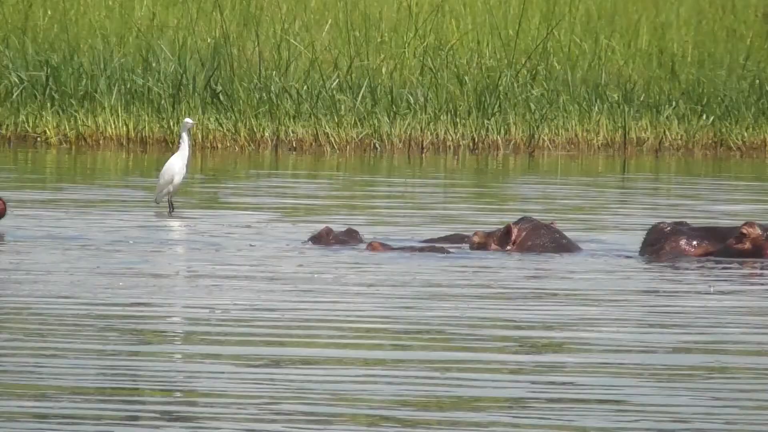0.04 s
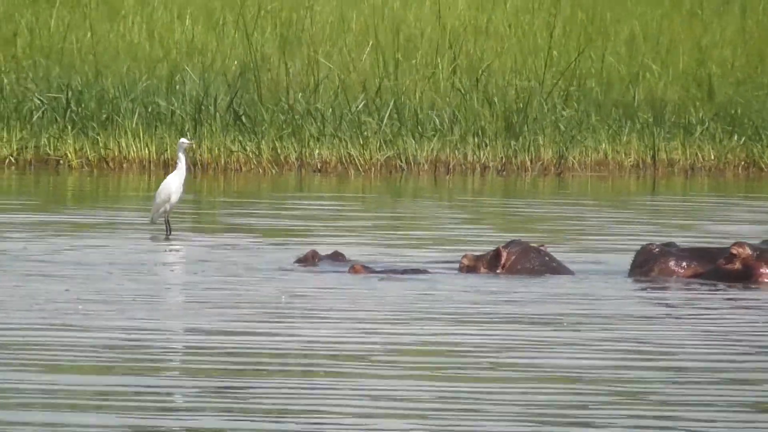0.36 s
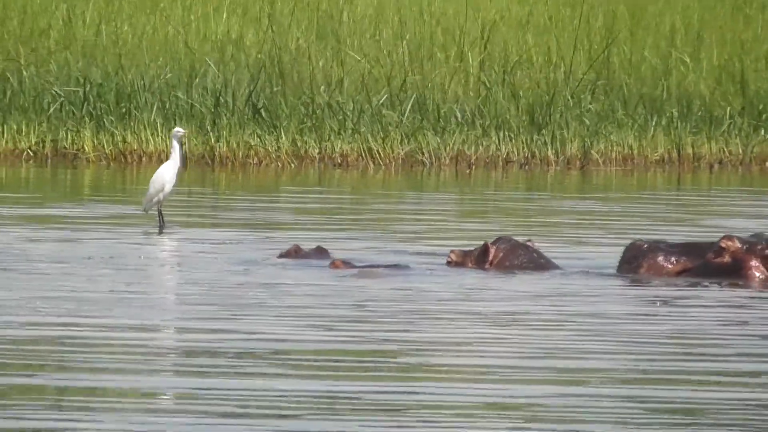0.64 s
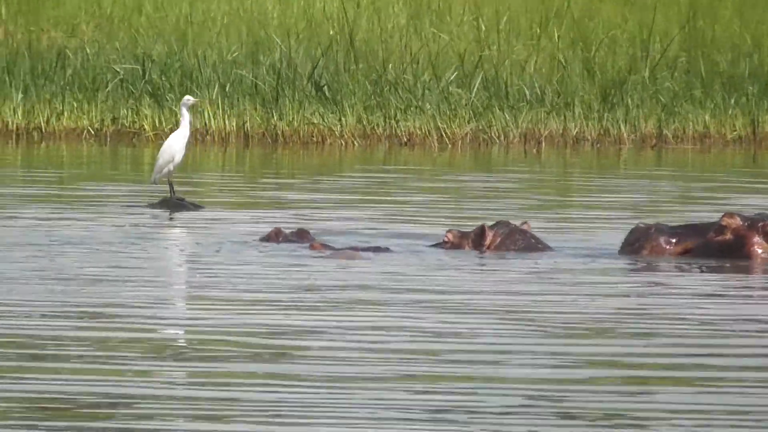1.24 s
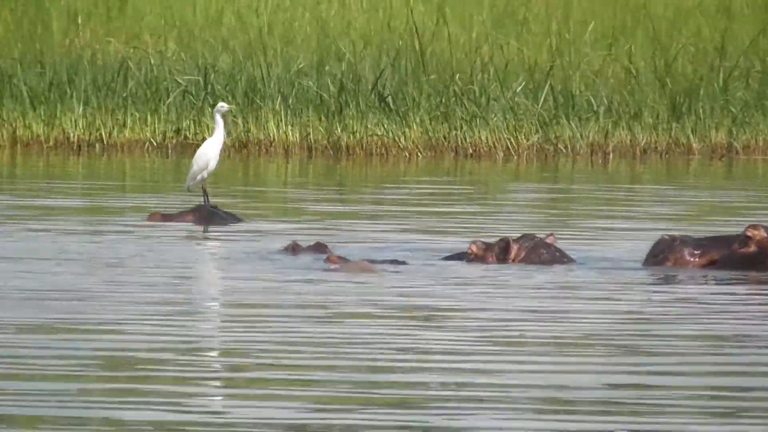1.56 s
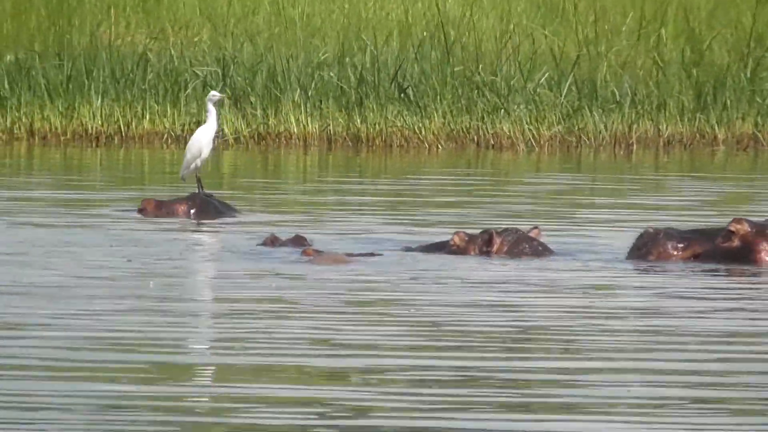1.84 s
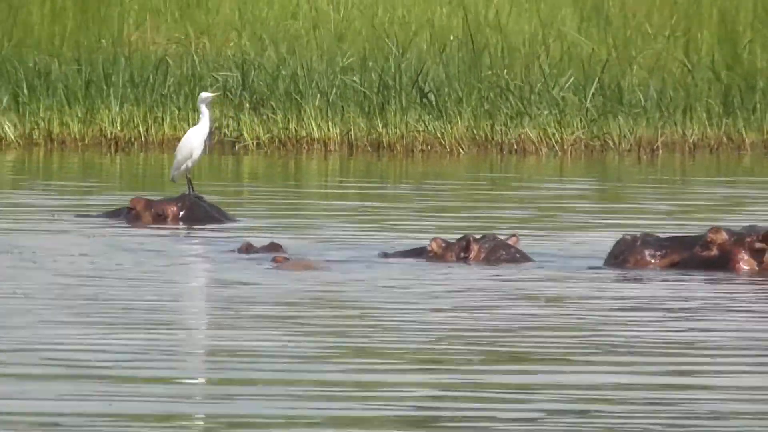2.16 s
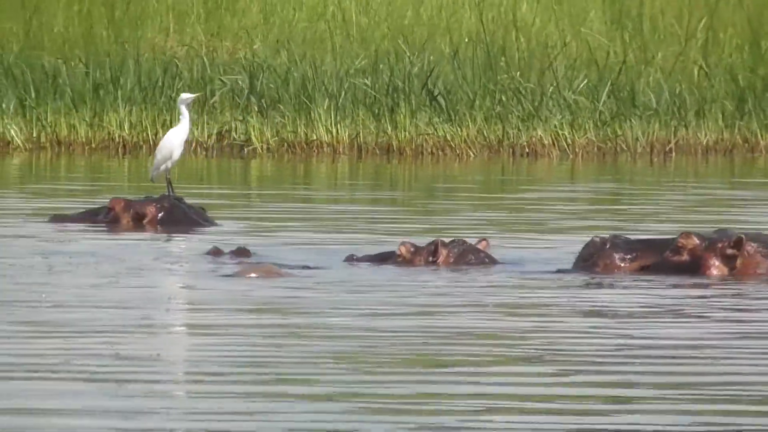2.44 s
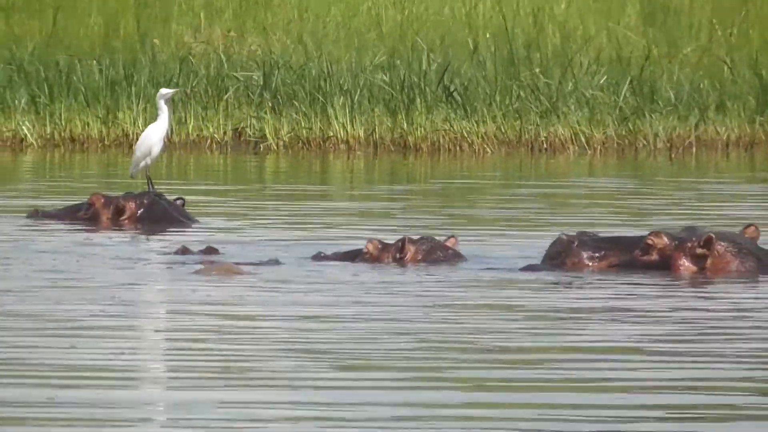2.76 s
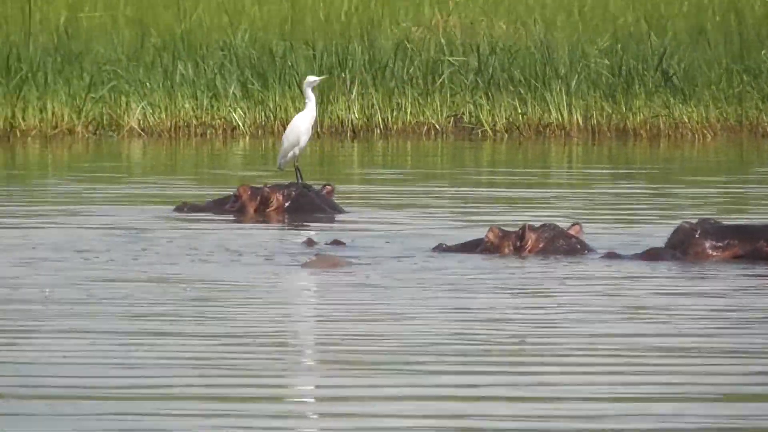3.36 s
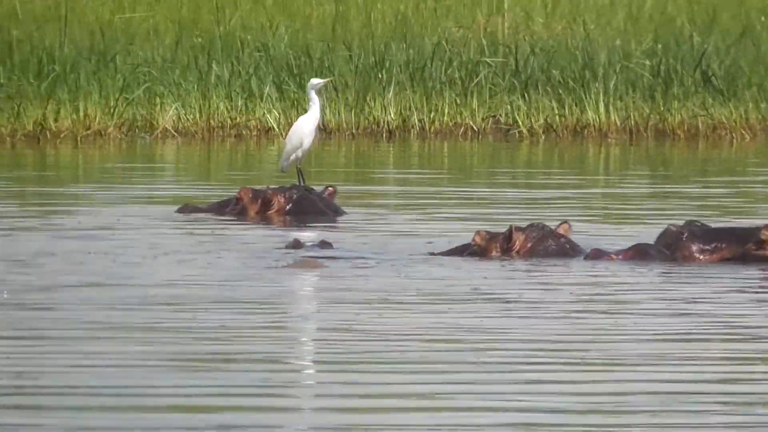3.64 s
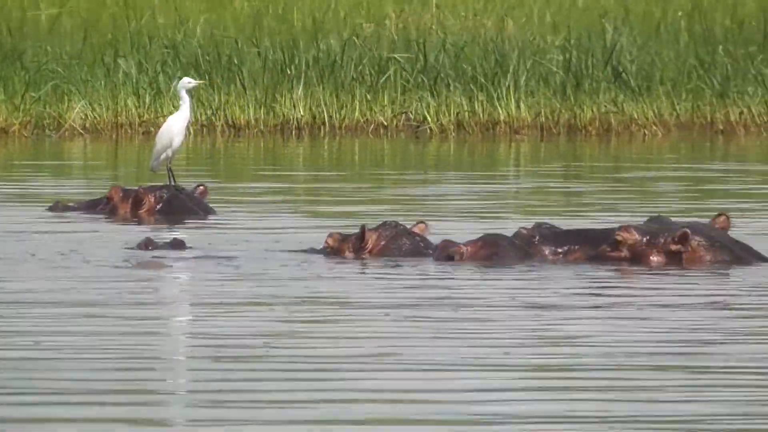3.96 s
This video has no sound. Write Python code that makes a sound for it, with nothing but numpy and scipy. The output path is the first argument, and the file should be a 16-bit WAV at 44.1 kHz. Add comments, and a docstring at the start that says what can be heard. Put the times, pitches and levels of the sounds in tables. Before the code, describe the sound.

A small outboard motor drones at a steady speed, heard from on board a boat on a river. Water churns and hisses at the bow throughout, with small splashes, soft slaps on the hull and light wind bumping the microphone.

```python
"""A small outboard motor pushes a boat along a river at a steady speed, heard from on board.
Its exhaust thumps so fast that it drones, its gears whine and the hull hums along.
The bow wave churns and throws hissing spray, both full of tiny ringing bubbles.
Splashes land close by, small waves slap the hull and light wind bumps the microphone."""
import sys
import numpy as np
from scipy import signal
from scipy.fft import rfft, irfft
from scipy.io import wavfile

SR = 44100
rng = np.random.default_rng(int(sys.argv[2]) if len(sys.argv) > 2 else 0)


def wav_record(signal):
    """Record a signal, one row per channel, as 16-bit PCM in the file named by sys.argv[1]."""
    frames = np.transpose(np.atleast_2d(signal))
    bounded = np.clip(frames, -1, 1)
    # unit amplitude maps onto the largest positive 16-bit level
    quanta = np.round(bounded * 32767).astype(np.int16)
    wavfile.write(sys.argv[1], SR, quanta)


N = 176400
TIME = np.arange(N) / SR  # seconds
FREQS = np.arange(N // 2 + 1) * SR / N  # Hz


def motor():
    """The turning engine drives the exhaust and gears; with the hull's hum they sit slightly right."""
    # Each row: time in seconds, engine speed in turns per second.
    engine_speed = [(0.1, 32.8), (0.5, 33.03), (1.0, 32.85), (1.45, 32.89), (1.7, 32.42), (1.95, 32.65),
                    (2.2, 32.93), (2.5, 32.78), (2.8, 32.94), (3.4, 33.0), (3.75, 32.6), (4.0, 32.69)]
    speed = curve(engine_speed)
    turns = np.cumsum(speed) / SR
    sound = level(exhaust(speed, turns), -18) + level(gears(turns), -38.5) + level(hull_hum(), -36.5)
    return sound * undb([[-.5], [.5]])


def exhaust(speed, turns):
    """One thump on every turn makes a drone: a stack of tones at multiples of the engine speed."""
    # Each row: multiple of the engine speed, relative level in dB.
    tones = [(2,0.5),(3,-26),(4,-1),(5,1.5),(6,0.67),(7,-1),(8,-6),(9,-2.5),(10,-5.5),(11,-13),(12,-4.5),(15,-8.5),(16,-8.5),(18,-12),(19,-9.5),(20,-4),(22,-12),(24,-22),(30,-13.5)]
    # Each row: time in seconds, level change in dB of the sixth multiple, near 200 Hz.
    sixth_swell = [(0.1,2),(0.4,3.5),(0.65,-0.5),(1.05,-6),(1.28,2),(1.5,-5),(1.8,2.5),(2.05,0),(2.3,5.5),(2.65,-5),(3.0,0),(3.3,5),(3.7,-1.5),(4.0,1.5)]
    # Each row: time in seconds, level change in dB of the ninth multiple, near 300 Hz.
    ninth_swell = [(0.1,2.5),(0.65,6),(1.05,2.5),(1.5,-0.5),(2.0,1),(2.2,-8),(2.4,-2),(2.85,2.5),(3.3,3.5),(3.68,-7),(4.0,-5)]
    # Each row: time in seconds, level change in dB at throb_hz (tones further away change less).
    drone_swell = [(0.1, -1.2), (0.6, -0.5), (1.02, 0), (1.3, 1.8), (1.62, 1), (2.3, -1), (2.71, 0.5),
                   (2.88, 1.5), (3.03, -6.5), (3.15, -1), (3.3, -1.5), (3.69, -0.5), (4.0, 0.5)]
    throb_hz, scatter_above_hz = 234.5, 345
    lead_s, jitter_s, late_s, echo_s, echo_gain = .00049, .00007, .00803, .013, .48
    thumps = turns + speed * (lead_s + jitter_s * wander(13))
    firing_db = 1.2 * wander(29) + curve(drone_swell)  # the engine fires unevenly
    swells = {6: curve(sixth_swell), 9: curve(ninth_swell)}
    out = np.zeros(N)
    for multiple, db in tones:
        hz = multiple * speed.mean()
        # The top of each thump comes late, an echo shifts each tone's timing,
        # and the hull throws the higher tones out of step.
        late = 2 * np.pi * late_s * max(hz - throb_hz, 0)
        echo = np.angle(1 + echo_gain * np.exp(-2j * np.pi * hz * echo_s))
        scatter = 2 * np.pi * rng.random() * (hz > scatter_above_hz)
        throb_db = np.exp(-np.log2(hz / throb_hz) ** 2) * firing_db
        waver_db = min(hz / throb_hz, 1) * 1.04 * wander(3.5)
        gain = undb(db + throb_db + waver_db + swells.get(multiple, 0))
        out += gain * np.cos(2 * np.pi * multiple * thumps - late + echo + scatter)
    return out


def gears(turns):
    """The gears whine: one wavering tone that follows the engine speed."""
    # Each row: time in seconds, level change in dB.
    whine_swell = [(0.1,-2),(0.5,0.5),(1.1,-2.5),(1.35,0),(1.6,-3.5),(2.25,0.5),(2.65,0),(2.95,1),(3.4,1),(3.7,-2),(4.0,-3)]
    cycles_per_turn = 52.04
    gain = undb(curve(whine_swell) + 1.5 * wander(9.2))
    return gain * np.sin(2 * np.pi * cycles_per_turn * turns + .46 * wander(18))


def hull_hum(hz=93.1):
    """The hull hums on one low note that comes and goes."""
    return wander(4.4) * np.sin(2 * np.pi * hz * TIME)


def bow_wave():
    """The bow wave churns: bands of noise surge together and flicker alone, and bubbles gurgle in it."""
    # Each row: frequency in Hz, relative level in dB.
    churn_tone = [(30,-14),(70,-10.5),(130,0),(250,3),(420,-2.3),(700,-1.5),(1100,-3.5),(1450,-9.5),(1900,-9.5),(3000,-15),(3900,-22),(5000,-22.5),(9000,-31),(12500,-62)]
    # Each row: time in seconds, swell (one unit is 0.68 dB).
    swell = [(0.1, -3), (0.34, -1), (0.4, 1.3), (0.5, -3.5), (0.64, -0.7), (0.76, -1.8), (0.96, 2),
             (1.02, -2), (1.18, -1.1), (1.34, 1.5), (1.58, -1.5), (1.62, -0.2), (1.78, 0), (1.9, 1.3),
             (1.96, -1.5), (2.39, 1), (2.45, -0.5), (2.77, 3), (2.92, 2), (3.01, -3.5), (3.09, 0.8),
             (3.21, -2.5), (3.27, 3), (3.34, 1.5), (3.4, -0.5), (3.55, 2), (3.67, -1.5), (3.93, 2.5),
             (4.0, -1.5)]
    half_octaves = 2 * np.log2(np.maximum(FREQS, 1))
    spectrum = rfft(colour(rng.standard_normal((2, N)), churn_tone))
    surge = undb(.4 * wander(23) + .68 * curve(swell))
    churn = np.zeros((2, N))
    for band in range(8, 30):
        share = np.maximum(1 - abs(half_octaves - band), 0)
        churn += irfft(spectrum * share, N) * undb(1.53 * wander(38))
    gurgle = bubbles(low_hz=373, high_hz=3470, cycles=8.1, scatter_db=4, slope=.39, count=1600)
    return surge * (level(churn, -21.5) + level(gurgle, -28.5))


def spray():
    """Spray falls back in spurts: a hiss full of tiny drops."""
    # Each row: frequency in Hz, relative level in dB.
    spray_tone = [(1500,-0.5),(3000,-4.5),(4300,-3.5),(5000,-6),(5700,-1),(6300,-1.5),(7300,1.5),(8400,-0.5),(10000,-4.5),(11200,-11.5),(12500,-25),(16000,-40)]
    # Each row: time in seconds, swell (one unit is 0.67 dB).
    swell = [(0.1, -0.4), (0.22, -3), (0.26, -0.5), (0.46, -0.5), (0.54, -4), (0.7, 1), (0.76, -2.5),
             (0.84, 1), (1.1, 1.6), (1.22, -3), (1.32, 0.0), (1.52, -0.5), (1.78, -2), (1.88, 1.5),
             (2.26, -1.8), (2.31, 3), (2.59, -1.5), (2.63, 3.5), (2.71, -3.5), (2.91, 5), (3.03, 0.7),
             (3.13, 2.3), (3.19, 0.7), (3.39, -2), (3.45, 0.7), (3.69, -1.3), (3.79, 4), (4.0, -0.5)]
    fizz = bubbles(low_hz=2525, high_hz=12040, cycles=14.4, scatter_db=1.5, slope=-.51, count=5000)
    hiss = rng.standard_normal((2, N))
    spurts = undb(.47 * wander(5.5) + wander(37) + .67 * curve(swell))
    return spurts * (level(colour(hiss, spray_tone), -31) + level(colour(fizz, spray_tone), -33.5))


def bubbles(low_hz, high_hz, cycles, scatter_db, slope, count):
    """Two clouds of `count` bubbles each; a slope above zero makes the big, low ones louder."""
    out = np.zeros((2, N))
    for cloud in out:
        for when, pitch, strength, ring in rng.random((count, 4)):
            hz = low_hz * (high_hz / low_hz) ** pitch
            boost_db = -scatter_db * np.log(1 - .99 * strength)  # a few stand out
            gain = undb(boost_db) * (low_hz / hz) ** slope
            add_bubble(cloud, when * N / SR, hz, gain, cycles * (.5 + ring))
    return out


def add_bubble(out, start_s, hz, gain, cycles, rise=.19):
    """One bubble rings: it swells, then dies away as its pitch rises."""
    first = int(start_s * SR)
    life = np.arange(int(cycles * SR / hz))[:max(N - first, 0)] * hz / SR / cycles  # from 0 to 1
    ring = np.sin(2 * np.pi * cycles * life * (1 + rise * life / 2))
    swell = 1 - np.exp(-(life * cycles / 1.15) ** 2)
    out[first:first + len(life)] += gain * ring * swell * .01 ** life


def splashes(splat_s=.0033):
    """A few splashes land close to the hull, each a short splat of noise and a ringing bubble."""
    # Each row: start in seconds, pitch in Hz, ring level in dB, ring length in cycles, splat level in dB.
    drops = [(.257,8170,-21,25,-22),(.283,6700,-18,60,-29),(0.441,1200,-8,10,-13),(.823,836,-4.5,12,-8),(1.607,1190,-12,18,-17),(1.858,2840,-17,10,-31),(2.187,7560,-7.5,36,-23),(2.626,7680,-19,20,-31),(2.969,3300,-8,7.1,-20),(3.352,4060,-6,5.8,-19),(3.48,6800,-8,25,-22),(3.76,7450,-26,25,-25),(3.934,640,-4,24,-18)]
    # Each row: multiple of the splash's pitch, relative level in dB.
    splat_tone = [(.25,-30),(.7,6),(1,-2),(1.4,-0.5),(2,-19),(4,-55)]
    # Each row: frequency in Hz, level change in dB that dulls the highs.
    dulling = [(9000,0),(11000,-6),(12500,-28),(16000,-45)]
    out = np.zeros(N)
    for start_s, hz, ring_db, cycles, splat_db in drops:
        add_bubble(out, start_s, hz, undb(ring_db), cycles)
        age = np.maximum(TIME - start_s, 0) / splat_s
        splat = colour(rng.standard_normal(N), np.array(splat_tone) * [hz, 1])
        out += level(splat, splat_db) * np.sqrt(age) * np.exp(1 - 2 * age)
    return colour(out, dulling)


def slaps(half_length_s=.016, half_width_octaves=.78):
    """Small waves meet the hull with soft, hollow thuds."""
    # Each row: loudest moment in seconds, pitch in Hz, level at that moment in dB.
    waves = [(.695,210,-19),(1.06,520,-19.5),(1.085,169,-21),(1.29,210,-20),(1.62,644,-20),(2.133,330,-19),(2.41,556,-22),(2.9,230,-20.5),(3.14,190,-19),(3.635,190,-23),(3.988,200,-20)]
    octaves = np.log2(np.maximum(FREQS, 1))
    out = np.zeros(N)
    for peak_s, hz, db in waves:
        band = np.exp(-((octaves - np.log2(hz)) / half_width_octaves) ** 2)
        thud = irfft(rfft(rng.standard_normal(N)) * band, N)
        out += level(thud, db) * np.exp(-((TIME - peak_s) / half_length_s) ** 2)
    return out


def wind():
    """Short swirls of air thump the microphone, a little differently on each side."""
    # Each row: loudest moment in seconds, length in seconds, level at that moment in dB.
    bumps = [(0.6,0.086,-24.5),(1.076,.03,-21.5),(1.574,0.053,-21),(1.7,0.056,-21),(2.166,0.038,-23),(2.443,0.041,-31),(2.67,0.028,-30),(2.84,0.06,-20.5),(2.904,0.04,-21),(3.14,0.028,-24),(3.29,0.064,-22),(3.643,0.11,-25.5),(3.92,0.12,-22)]
    # Each row: frequency in Hz, relative level in dB.
    rumble_tone = [(12,-14),(35,2),(70,5),(120,1.5),(250,-5),(600,-78)]
    swirls = sum(undb(db) * np.exp(-2 * ((TIME - peak_s) / length) ** 2) for peak_s, length, db in bumps)
    air = rng.standard_normal(N) + 1.9 * rng.standard_normal((2, N))
    return swirls * level(colour(air, rumble_tone), 0)


def spread(water):
    """Make the water wide: both ears share one signal; a second is added left and taken away right."""
    # Each row: frequency in Hz, level change of the second signal in dB.
    width = [(60,7),(250,-7.5),(600,-11),(1300,-8.5),(2500,-10.5),(5000,-22),(7500,-20),(10000,-4.5),(13000,0)]
    # Each row: frequency in Hz, how much louder the left is than the right in dB.
    lean = [(100,-5.5),(300,1.5),(700,2.5),(1400,0.9),(3000,0),(6000,0),(10000,-2.5)]
    middle, side = water[0], colour(water[1], width)
    return np.array([colour(middle + sign * side, np.array(lean) * [1, sign / 2]) for sign in (1, -1)])


def undb(db):
    """Turn decibels into a number to multiply by."""
    return 10 ** (np.asarray(db) / 20)


def level(x, db):
    """Set a sound's average (rms) level."""
    return x * undb(db) / np.sqrt(np.mean(x ** 2))


def curve(rows):
    """Join (seconds, value) points with straight lines."""
    return np.interp(TIME, *np.array(rows).T)


def colour(x, rows):
    """Turn a sound's lows and highs up or down along (Hz, dB) points."""
    hz, db = np.array(rows).T
    gain = undb(np.interp(np.log(np.maximum(FREQS, 1)), np.log(hz), db))
    return irfft(rfft(x) * gain, N)


def wander(rate_hz):
    """Smooth random motion around zero, with a typical size of 1."""
    spectrum = rfft(rng.standard_normal(N)) * np.exp(-.5 * (FREQS / rate_hz) ** 2)
    spectrum[0] = 0
    return level(irfft(spectrum, N), 0)


def scene():
    """Motor, water and wind together."""
    water = spread(bow_wave() + spray())
    return motor() + water + splashes() + slaps() + wind()


def record(dry, start_s=.078, top_hz=15900):
    """The sound starts suddenly and loses its very highest part."""
    fade_in = np.clip((TIME - start_s) / .002, 0, 1)
    return signal.sosfilt(signal.ellip(10, .1, 80, top_hz, fs=SR, output="sos"), dry * fade_in)


dry = scene()
out = record(dry)
wav_record(out)
```